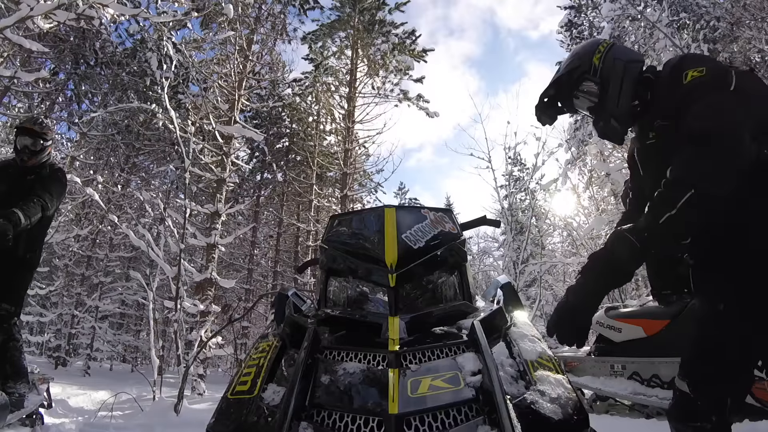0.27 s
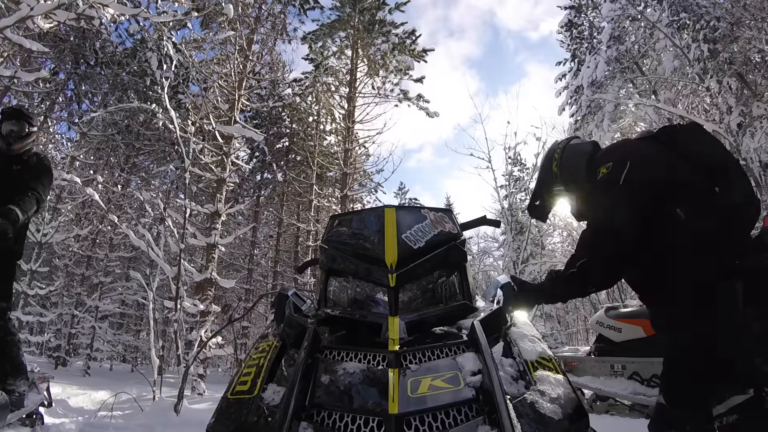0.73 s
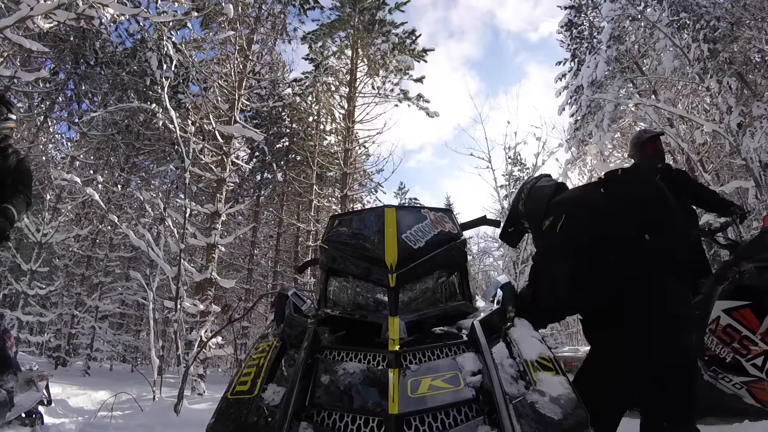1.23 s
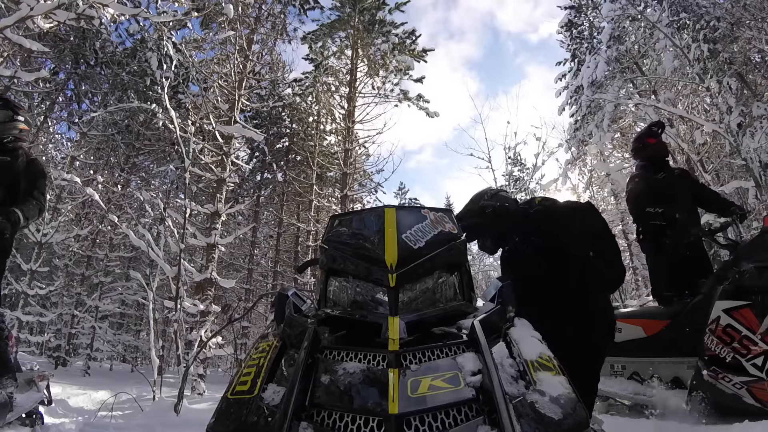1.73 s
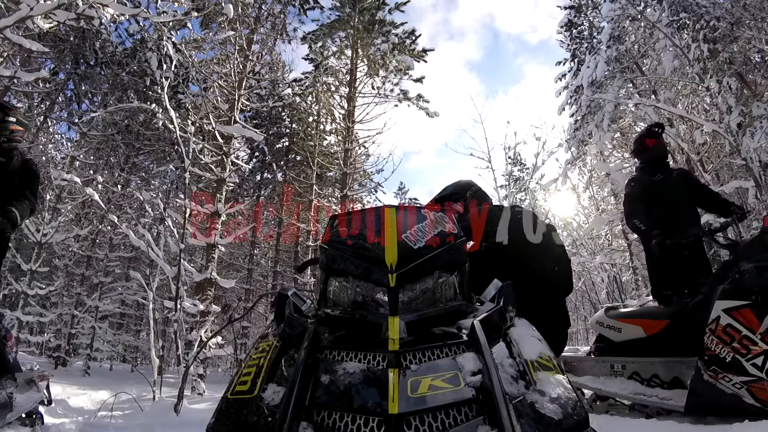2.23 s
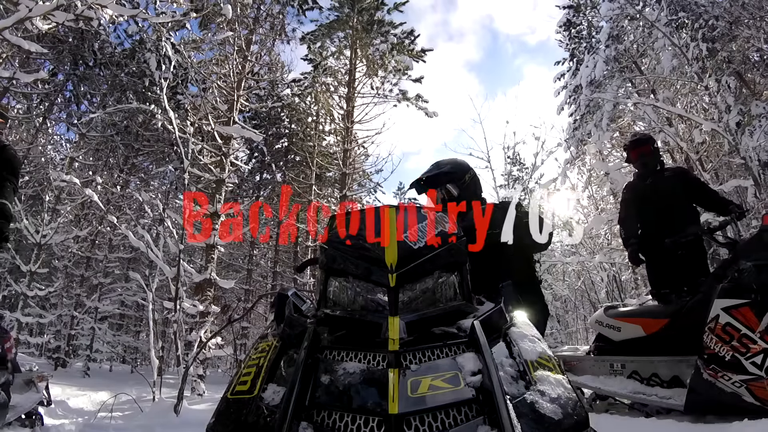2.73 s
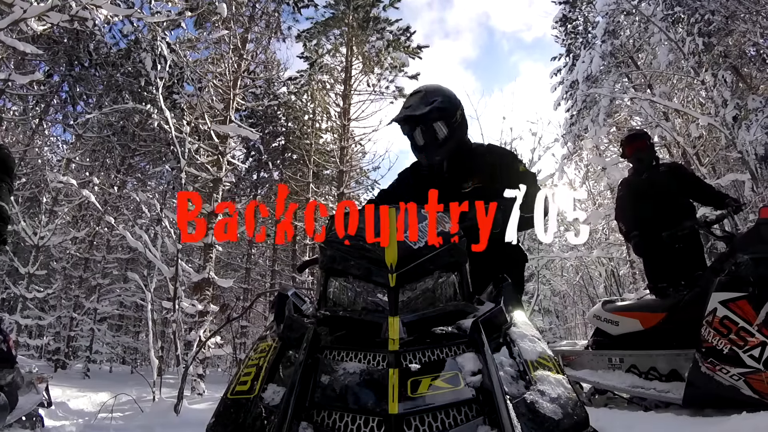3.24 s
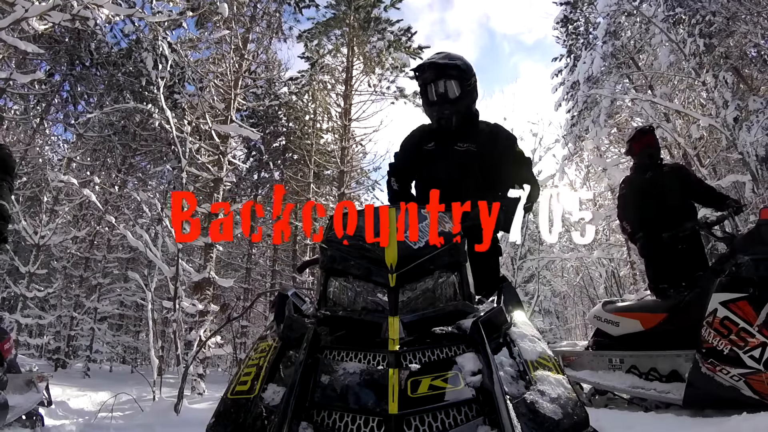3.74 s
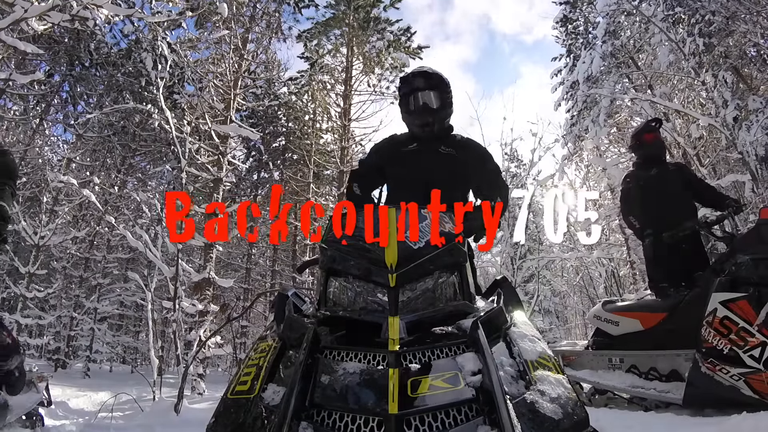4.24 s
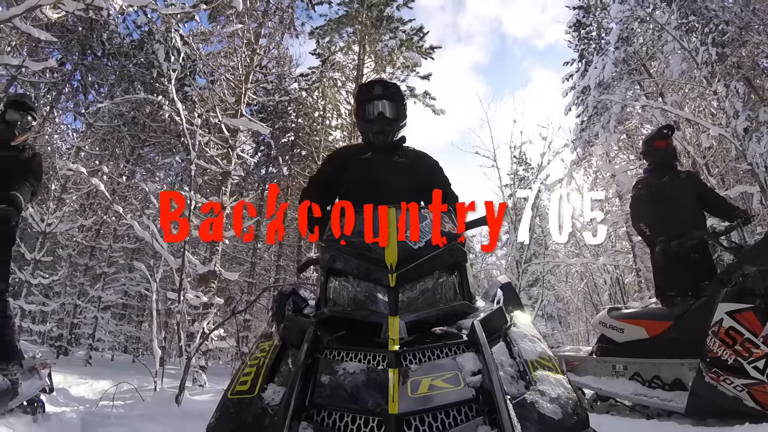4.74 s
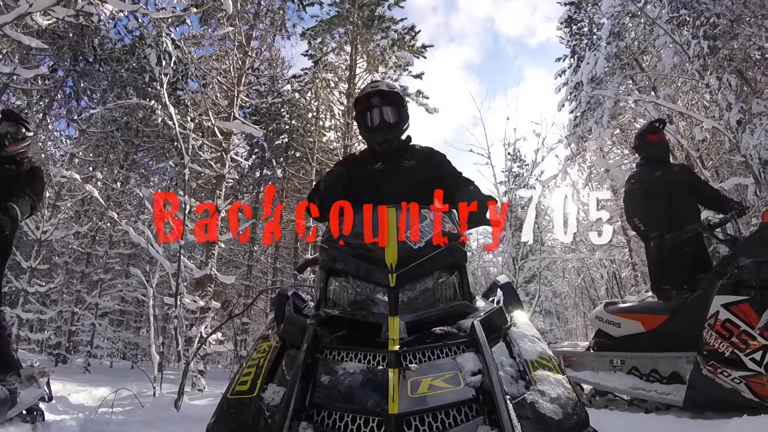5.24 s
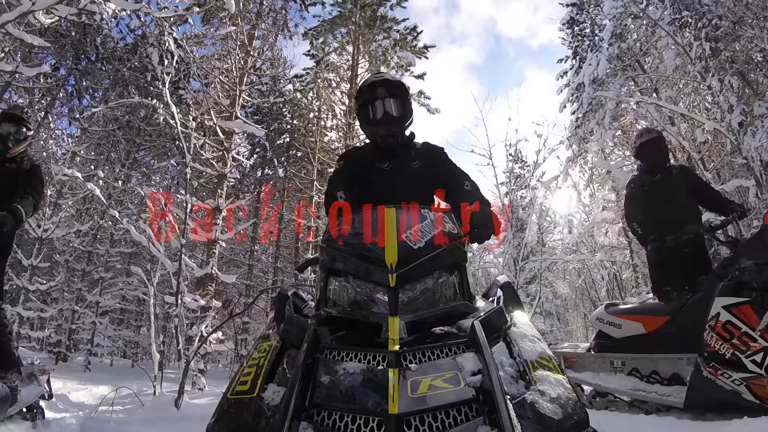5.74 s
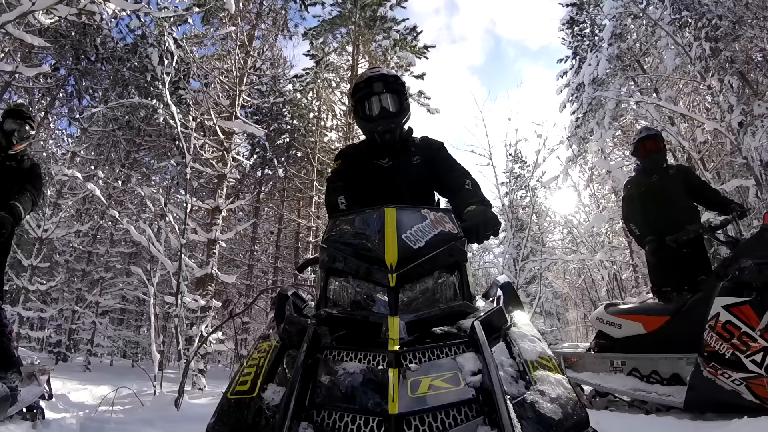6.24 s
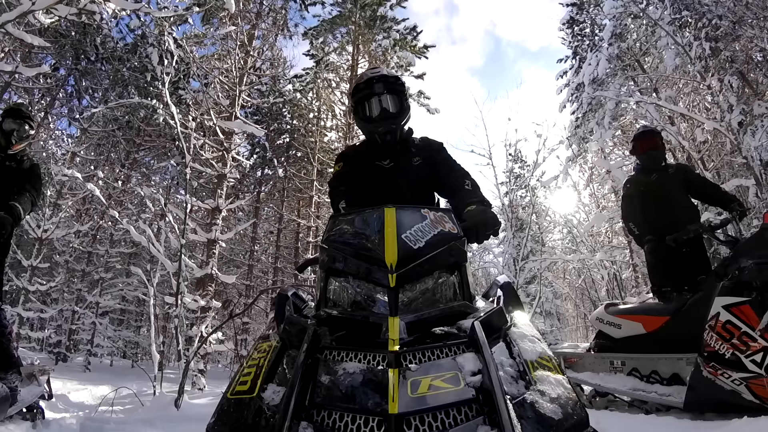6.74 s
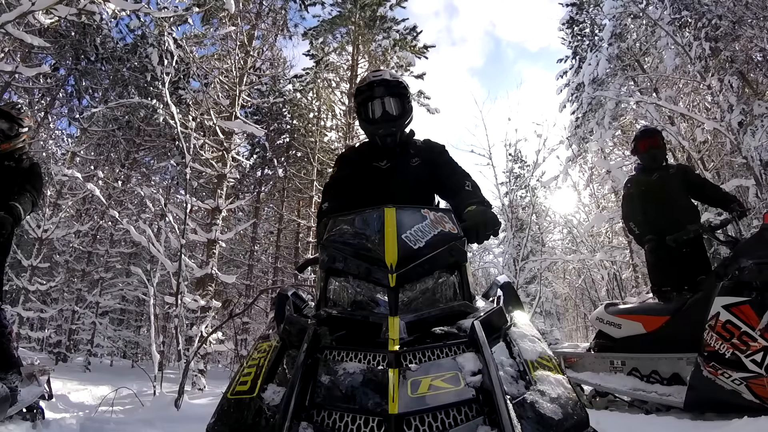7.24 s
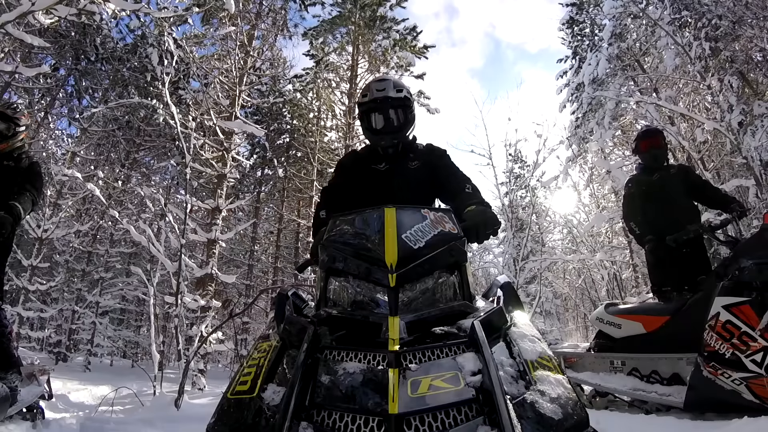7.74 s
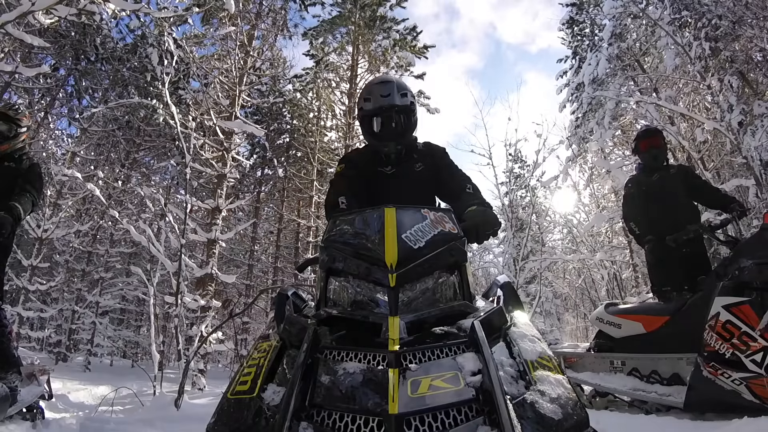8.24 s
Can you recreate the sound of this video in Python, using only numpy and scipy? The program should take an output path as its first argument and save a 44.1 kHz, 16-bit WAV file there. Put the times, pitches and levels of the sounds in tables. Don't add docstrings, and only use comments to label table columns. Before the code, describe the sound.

Close, boxy small-camera sound of snowmobiles idling among snowy trees. Irregular deep putts and short puffs of exhaust sit over a steadier distant drone and a breathy hiss. Light metallic ticks scatter through the middle. After about six seconds a loud knock cracks, the hiss dips, and a rope starter whirs up and back down with scraping and rattling, then a faint rewind and a last crunch of snow.

```python
import sys
import numpy as np
from scipy import signal
from scipy.fft import rfft, irfft, next_fast_len
from scipy.io import wavfile
from scipy.ndimage import uniform_filter1d

SR = 44100
rng = np.random.default_rng(int(sys.argv[2]) if len(sys.argv) > 2 else 0)


def linear_from_db(decibels):
    return 10 ** (np.asarray(decibels, float) / 20)


def pcm_store(signal):
    levels = np.round(np.clip(np.atleast_2d(signal), -1, 1) * 32767)
    wavfile.write(sys.argv[1], SR, levels.astype(np.int16).T)


N = 374409
T = np.arange(N) / SR

# frequency in Hz, density in dB per Hz.
RUMBLE = [(15, -26), (30, 8), (42, 6), (58, -0.5), (90, -5.5), (200, -39.5), (500, -87.5)]

# resonance in Hz, width in Hz, level in dB.
FAR_PIPE = [(115.1, 16.2, -0.5), (69, 90, -15.5), (176, 79, -15), (237, 24, -11.5), (298, 18, -11),
            (460, 71, -24.5)]
# time in seconds, level in dB.
FAR_LEVEL = [(0, -38), (0.25, -25), (0.55, -29), (1.0, -29), (1.2, -33), (2.1, -29), (3.3, -26.5),
             (3.7, -28), (4.7, -26), (5.0, -32), (5.4, -28), (6.1, -25), (6.42, -23.5), (6.62, -32),
             (7.1, -30), (7.5, -24), (7.7, -30), (8.1, -26)]

# first firing in seconds,
# spacing in ms, count, level in dB.
CYLINDER_A = [(0.006, 98, 2, -26), (0.343, 103, 4, -27), (0.788, 234, 2, -26), (1.054, 100, 1, -25),
              (1.186, 132, 2, -19.5), (1.484, 136, 2, -19), (1.722, 103, 2, -19), (1.958, 102, 2, -20),
              (2.191, 135, 4, -20), (2.697, 66, 2, -22), (2.897, 134, 3, -18), (3.269, 99, 2, -20),
              (3.5005, 136.3, 3, -18.5), (3.842, 100, 2, -20), (4.075, 134, 3, -19), (4.442, 131, 2, -19),
              (4.673, 104, 2, -21), (4.915, 102.3, 3, -19), (5.187, 100, 1, -27), (5.253, 100, 1, -21),
              (5.386, 132, 2, -20), (5.585, 137, 2, -18.5), (5.824, 102, 5, -21), (6.266, 102, 2, -22),
              (6.4005, 136, 2, -24), (6.779, 100, 1, -27), (6.854, 84, 2, -21.5), (7.011, 67, 2, -24),
              (7.25, 100, 1, -21), (7.383, 100, 1, -19), (7.518, 100, 1, -22), (7.5905, 131.5, 2, -25),
              (8.028, 103, 2, -21), (8.165, 100, 2, -22), (8.394, 100, 1, -21)]
CYLINDER_B = [(0.055, 135, 2, -29), (0.241, 47, 2, -24), (0.431, 101, 5, -25), (0.867, 86, 2, -25),
              (1.004, 100, 1, -22.5), (1.101, 100, 1, -27), (1.137, 100, 1, -20), (1.2665, 135, 5, -20),
              (1.91, 99, 3, -21), (2.242, 100, 1, -22), (2.343, 100, 1, -27), (2.411, 134.2, 6, -19),
              (3.182, 100, 1, -25), (3.249, 100, 1, -18.5), (3.383, 136, 4, -18), (3.891, 99, 2, -19),
              (4.125, 134, 3, -17), (4.49, 135, 3, -19.5), (4.8645, 101.2, 6, -18), (5.499, 137, 3, -18),
              (5.874, 69, 2, -22), (6.048, 132, 2, -20), (6.2155, 134, 2, -23), (6.418, 137, 2, -23),
              (6.678, 100, 1, -26), (6.754, 118, 2, -21), (6.978, 59, 2, -22), (7.168, 166, 2, -23.5),
              (7.468, 100, 1, -18.5), (7.601, 36, 2, -24), (7.772, 138, 2, -20), (8.011, 103, 2, -22),
              (8.247, 134, 2, -20), (8.448, 100, 1, -21)]
# frequency in Hz, ring in ms, level in dB, delay in ms.
LIT_PIPE = [(110, 9.3, 4.9, -5.6), (102, 4.5, 4.6, 8.0), (172, 4.7, -4.1, -4.3), (280, 3.4, -2.6, -3.3),
            (260, 8, -17.5, -2.3)]
# frequency in Hz, ring in ms, level in dB, delay in ms.
UNLIT_PIPE = [(97, 11.3, -1.5, -1.3), (239, 2.1, -19, -0.4)]
STROKE_HZ = 59.3
FIRING_DB, FIRING_SCATTER_DB = 1.05, 0.8
FOLLOW_DB = -0.6
GATHER_DB, GATHER_S = 4, 0.07

# frequency in Hz, density in dB per Hz.
INTAKE = [(200, -23.5), (400, 0.5), (700, -6), (1250, -7), (1600, -20), (2400, -37), (4000, -95)]
# frequency in Hz, density in dB per Hz.
FAN = [(900, -16), (1500, 0), (2300, -2.5), (3100, -5.5), (4200, -7.5), (5500, -67)]
# time in seconds, level in dB.
FLOW = [(0, -20.5), (0.18, -12), (0.195, -9), (0.3, -0.5), (0.8, -1), (1.4, -2), (2.5, -1.5), (3.3, -0.7),
        (3.7, 0), (4.9, -0.5), (5.3, 0), (6.4, -2.5), (6.6, -6), (7.0, -9), (7.4, 3.5), (7.85, 1.5),
        (8.3, 0), (8.49, 3)]
# time in seconds, level in dB.
CHUFFS = [(0.7595, -32.5), (1.199, -35), (2.0053, -30), (2.056, -28), (2.2337, -28), (1.57, -32.5),
          (1.766, -34), (1.815, -38), (2.3246, -36), (2.382, -34.5), (2.457, -34.5), (2.527, -36.5),
          (2.617, -30), (2.758, -35.5), (2.861, -30), (3.031, -32), (3.0796, -39.5), (3.364, -39.5),
          (3.381, -36), (3.436, -36.5), (3.322, -39.5), (3.514, -33.5), (3.532, -39.5), (3.577, -35),
          (3.655, -38.5), (3.67, -37.5), (3.784, -36.5), (3.216, -37), (3.267, -35), (3.489, -32.5),
          (3.704, -37), (4.014, -30), (4.492, -32), (4.6438, -30.5), (4.8673, -34.5), (4.952, -34.5),
          (5.0382, -34), (5.087, -34), (5.2205, -37), (5.17, -38), (5.265, -37.5), (5.3572, -35),
          (5.951, -33), (6.335, -32.5), (4.145, -35.5), (4.337, -41.5), (4.811, -35), (5.405, -27),
          (5.4886, -37), (5.777, -28), (6.133, -34.5), (6.285, -27), (6.3619, -45), (7.897, -39),
          (8.182, -39), (8.2447, -34), (8.315, -36)]
INTAKE_DB, FAN_DB, HISS_DB = -44, -49.5, -48.5
INTAKE_SLOPE, FAN_SLOPE = 0.42, 1
FAN_START_DB, FAN_SETTLE_S = 10, 0.49
VEIL_S, VEIL_HZ = 0.82, 7140
LEAK_DB, LEAK_SCATTER_DB, LEAK_TOP_DB, LEAK_LEAD_S = -46, 3, -37, 0.006

# start, rise, hold and fall in seconds, level in dB.
SNOW = [
    (0.146, 0.083, 0.068, 0.04, -39.5),
    (0.683, 0.077, 0.553, 0.092, -43.5),
    (7.975, 0.092, .04, .05, -40.5),
    (8.199, 0.049, .06, .05, -36.5),
]

# time in seconds, ring level in dB, ring in Hz, ring in ms,
# crack level in dB, crack in ms.
KNOCKS = [(6.4975, -13, 686, 3.1, -29.5, 5.9), (6.497, -27, 950, 2.5, -39, 3.6),
          (6.494, -39, 630, 2, -26.5, 3.3), (6.5085, -15.5, 200, 5, -33.5, 2.3),
          (6.499, -23, 400, 3.4, -44, 3), (6.487, -35, 790, 3.3, -25.5, 3.3), (6.507, -25, 690, 3, -29, 2),
          (6.516, -21, 760, 4.8, -43.5, 1.9), (6.672, -37, 686, 3.7, -27.5, 12),
          (6.748, -35, 810, 3.7, -31, 11), (8.454, -31.5, 535, 5.8, -60, 3),
          (8.444, -43, 2050, 5.4, -34.5, 7.2), (6.61, -42, 4660, 6.5, -33, 7.8),
          (6.632, -45, 4610, 6, -50, 5), (6.1, -50, 4200, 4, -51, 5), (8.1, -54, 9100, 16, -61, 9.0),
          (6.52, -50, 6430, 22, -51, 9.0), (5.7, -53, 3700, 6, -46.5, 6.5),
          (6.685, -47, 8200, 14, -49.5, 5.0), (7.6, -43, 7200, 15, -48, 5.0), (7.8, -58, 2200, 9, -61, 5.0),
          (7.7415, -36, 2300, 3.5, -44.5, 4.0), (7.39, -46, 2200, 5, -53, 4.0),
          (0.159, -36, 580, 3.3, -68, 2.0), (6, -42, 2090, 7, -46, 6.5), (7.655, -43, 2100, 5.1, -60, 4),
          (7.785, -41, 1700, 4.9, -55, 4), (7.845, -40, 2030, 3.04, -52, 4), (5.5, -46, 1600, 5, -49, 4),
          (6.954, -42, 2090, 5, -48, 4), (6.475, -48, 2900, 1, -49, 1)]
# time in seconds, level in dB, ring in Hz.
TICKS = [(1.858, -39, 2200), (2.028, -39, 2400), (2.529, -40, 2500), (2.73, -38, 2300), (2.832, -39, 2000),
         (4.168, -38, 2300), (4.412, -39, 2400), (5.087, -39, 2200), (5.319, -39, 2500), (6.065, -40, 2200),
         (6.301, -38, 2400), (2.966, -39, 1920), (3.403, -36, 2300), (3.435, -38, 2500), (3.555, -37, 2400),
         (3.577, -40, 2900), (3.602, -40, 2400), (3.673, -37, 2400), (3.705, -37, 2100), (4.01, -38, 1850),
         (4.444, -40, 1600), (5.41, -42, 2200), (6.436, -40, 1750)]

# time in seconds, pawl rate in Hz, effort in dB.
STARTER = [
    [(6.57, 84.1, -4), (6.745, 100.9, 2), (6.815, 130.1, -0.5), (6.875, 143.1, 2.5), (7.02, 153.9, 1),
     (7.1, 141.3, 3), (7.3, 95.75, -1.5), (7.486, 61.06, 0), (7.75, 57.8, -9.5)],
    [(7.9, 88.1, -6), (8.158, 85.9, -14), (8.25, 83.4, -10), (8.4, 77.3, -16.5)],
]
# frequency in Hz, level in dB.
DRUM = [(60, -17), (135, 14), (165, 6), (210, 2.5), (300, 3), (440, -3), (580, -1), (730, 5.5), (900, -7),
        (1200, -14)]
# resonance in Hz, width in Hz, level in dB.
COWL = [(210, 120, -3), (424, 260, -5.5), (680, 110, -1), (990, 165, -10), (1450, 136, -11),
        (2106, 100, -15), (2428, 79, -12.5), (2270, 260, -18), (6470, 82, -20.5)]
# frequency in Hz, level in dB.
COWL_EDGE = [(1500, 0), (1850, -6), (2050, -2), (2480, -1), (2620, -12), (3500, -6), (5000, -1)]
TONE_DB, SCRAPE_DB, ROPE_DB = -41.5, -33.5, -41.5
TONE_SLOPE, ROPE_SLOPE = 1, 2.1
TONE_STUTTER_DB = 4
HALF_TURN = 0.4
HEAVE_DB = 7.5
# time in seconds, level in dB.
RATTLES = [(6.602, -47.5), (6.692, -43.5), (6.77, -45), (6.82, -50), (6.892, -50.5), (6.92, -49),
           (7.015, -50.5), (7.062, -52)]
RATTLE_HZ, RATTLE_MS, RATTLE_RASP_DB = 6500, 5.3, 10.5

# frequency in Hz, level in dB.
PORT = [(8, -49), (27, 4.5), (60, -1.5), (3000, 0.5), (4360, -7), (5600, 13.5), (6050, 6), (6450, 9.5),
        (7300, -2.5), (9600, -6.5), (10400, -14.5), (11200, -22.5), (11600, -40)]
SQUEEZE = 1.6
PATCH_HZ, PATCH_FROM_HZ, PATCH_FRAMES = 330, 10250, 7
FIZZ_DB, FIZZ_START_S = -77, 1.7


def noise():
    return rng.standard_normal(N)


def level(x, db=0):
    return x * linear_from_db(db) / np.sqrt(np.mean(x ** 2))


def colour(x, points):
    hz, db = np.transpose(points)
    size = next_fast_len(N)
    axis = np.log(np.arange(size // 2 + 1) * SR / size + 1)
    gain = linear_from_db(np.interp(axis, np.log(hz), db))
    return irfft(rfft(x, size) * gain, size)[:N]


def resonate(x, peaks):
    out = np.zeros(N)
    for k, (hz, width, db) in enumerate(peaks):
        b, a = signal.iirpeak(hz, hz / width, SR)
        out += (-1) ** k * linear_from_db(db) * signal.lfilter(b, a, x)
    return out


def swell(age):
    return np.e * age * np.exp(-age)


def ring(seconds, sizes, hz, ms):
    spikes = np.zeros(N + 1)
    at = np.clip(np.round(np.asarray(seconds) * SR).astype(int), 0, N)
    np.add.at(spikes, at, sizes)
    t = T[:SR // 8]
    carrier = np.sin(2 * np.pi * hz * t) if hz > 0 else 1
    return signal.fftconvolve(spikes[:N], swell(t / (ms / 1000)) * carrier)[:N]


def add(out, s, size, hz, ms, carrier=None):
    i = int(s * SR)
    t = T[:min(int(ms * SR / 80), N - i)]
    wave = np.sin(2 * np.pi * hz * t) if carrier is None else carrier[i:i + len(t)]
    out[i:i + len(t)] += size * swell(t / (ms / 1000)) * wave


def walk(rate):
    k = int(SR / rate)
    held = np.repeat(rng.standard_normal(N // k + 1), k)
    return 1.295 * uniform_filter1d(uniform_filter1d(held, k), k)[:N]


def air_rumble():
    return level(colour(noise(), RUMBLE) * linear_from_db(2.0 * walk(6.3)), -39.0)


def far_sled():
    jitter, scatter, catch = rng.standard_normal((3, 800))
    s = np.cumsum((1 + 0.085 * jitter) / 58.3)
    sizes = linear_from_db(1.8 * scatter - 7.6 * (catch < 0.2))
    drone = level(resonate(ring(s, sizes, 0, 0.67), FAR_PIPE))
    return drone * linear_from_db(np.interp(T, *np.transpose(FAR_LEVEL)))


def firings():
    rows = []
    for start, ms, count, db in [*CYLINDER_A, *CYLINDER_B]:
        rows += [(start + k * ms / 1000, db) for k in range(count)]
    s, db = np.transpose(sorted(rows))
    follows = np.diff(s, prepend=-1) < 1.4 / STROKE_HZ
    return s, db + FIRING_DB + FOLLOW_DB * follows + FIRING_SCATTER_DB * rng.standard_normal(len(s))


def strokes(lit):
    steps = np.maximum(np.round(np.diff(lit) * STROKE_HZ), 1)
    count = np.concatenate([[0], np.cumsum(steps)])
    every = np.arange(count[-1])
    unlit = np.setdiff1d(every, count)
    return np.interp(every, count, lit), np.interp(unlit, count, lit)


def near_twin(lit, lit_db, every, unlit):
    usual_db = np.interp(unlit, lit, uniform_filter1d(lit_db, size=7))
    waited = unlit - lit[np.searchsorted(lit, unlit) - 1]
    gather_db = GATHER_DB * np.minimum(waited / GATHER_S, 1)
    pump = linear_from_db(2.3 * rng.standard_normal(len(unlit)) + usual_db + gather_db)
    shake = np.sin(np.pi * np.interp(T, every, np.arange(len(every))))
    out = linear_from_db(-50.0) * shake * linear_from_db(2.0 * walk(4.5))
    for hz, ms, db, lag in LIT_PIPE:
        out += ring(lit + lag / 1000, linear_from_db(lit_db + db), hz, ms)
    for hz, ms, db, lag in UNLIT_PIPE:
        out += ring(unlit + lag / 1000, pump * linear_from_db(db), hz, ms)
    return out


def gas_chuffs(lit):
    leak_db = LEAK_DB + LEAK_SCATTER_DB * rng.standard_exponential(len(lit))
    leak_db = np.minimum(leak_db, LEAK_TOP_DB)
    before, after = [lit - LEAK_LEAD_S, leak_db], [lit + LEAK_LEAD_S, leak_db[::-1]]
    s, db = np.hstack([np.transpose(CHUFFS), before, after])
    sizes = linear_from_db(np.minimum(db, -28) + 35.0)
    return ring(s, sizes, 0, 0.98) + 0.5 * ring(s, sizes, 0, 4.0)


def gas(every, lit):
    puff_db = 2.5 * np.minimum(rng.standard_exponential(len(every)), 2.5)
    puffs = level(ring(every - 0.004, linear_from_db(puff_db), 0, 2.1))
    chuffs = gas_chuffs(lit)
    flicker = walk(30)
    intake = colour(noise() * (1 + 0.2 * puffs + 0.64 * chuffs), INTAKE)
    fan = colour(noise() * (1 + 0.12 * puffs + 0.5 * chuffs) * linear_from_db(flicker), FAN)
    hiss = noise() * (1 + 0.17 * puffs + 1.54 * chuffs) * linear_from_db(0.95 * flicker)
    hiss = colour(hiss, [(3000, -51.0), (4200, -5.5), (7500, -3.5), (11000, -6.0)])
    veiled = colour(hiss, [(VEIL_HZ / 2.5, -40), (VEIL_HZ * 1.03, 0)])
    hiss = hiss - np.exp(-T / VEIL_S) * veiled
    flow_db = np.interp(T, *np.transpose(FLOW))
    intake_db = INTAKE_DB + INTAKE_SLOPE * flow_db
    fan_db = FAN_DB + FAN_SLOPE * flow_db + FAN_START_DB * np.exp(-T / FAN_SETTLE_S)
    return level(intake) * linear_from_db(intake_db) + level(fan) * linear_from_db(fan_db) + level(hiss) * linear_from_db(HISS_DB + flow_db)


def snow():
    creak = colour(noise() * linear_from_db(1.1 * walk(120)),
                   [(250, -20.5), (380, -4.0), (620, -6), (700, -17), (2000, -18.0), (3000, -48)])
    press = colour(noise(), [(20, -20.5), (40, 8.5), (60, 4.5), (100, -34.5)])
    weight = np.zeros(N)
    for s, rise, hold, fall, db in SNOW:
        weight += linear_from_db(db) * np.interp(T, np.cumsum([s, rise, hold, fall]), [0, 1, 1, 0])
    return (level(creak) + level(press, 3.7)) * weight


def rasp():
    return level(colour(noise(), [(300, 13.0), (900, 6.5), (3000, -9.0), (10800, -0.5), (11600, -9.5)]))


def cowl_knocks():
    out, crack = np.zeros(N), rasp()
    for s, db, hz, ms, crack_db, crack_ms in KNOCKS:
        add(out, s, linear_from_db(db), hz, ms)
        add(out, s, linear_from_db(crack_db), hz, crack_ms, crack)
    return out


def clutch_ticks():
    out = np.zeros(N)
    for s, db, hz in TICKS:
        add(out, s, linear_from_db(db), hz, 0.3)
    return out


def drum_tone(turns, hz):
    edge, gain_db = np.transpose(DRUM)
    dull_db = -6 * np.clip(1 - hz / 140, 0, 1)
    tone = np.zeros(N)
    for k in range(1, 10):
        stutter_db = min(k / 3, 1) * TONE_STUTTER_DB * walk(36)
        db = np.interp(k * hz, edge, gain_db) + (k - 4) * dull_db + stutter_db
        tone += linear_from_db(db) * np.sin(2 * np.pi * k * turns + k * k)
    return np.sqrt(2) * tone * (1 + HALF_TURN * np.cos(np.pi * turns))


def starter():
    s, pawl_hz, effort = np.transpose(np.concatenate(STARTER))
    hz, effort_db = np.interp(T, s, pawl_hz), np.interp(T, s, effort)
    pulling = sum(1.0 * (T > pull[0][0]) * (T < pull[-1][0]) for pull in STARTER)
    turns = np.cumsum(hz * (1 + 0.013 * walk(35))) / SR
    gate = 1 + 0.2 * np.cos(2 * np.pi * turns)
    tone = drum_tone(turns, hz)
    heave = level(colour(noise(), [(25, -27), (45, 2), (62, 3.5), (85, -7.5), (130, -34)]), HEAVE_DB)
    scrape = colour(resonate(noise() * gate * linear_from_db(1.7 * walk(25.0)), COWL), COWL_EDGE)
    rope = colour(noise() * gate * linear_from_db(0.33 * walk(35)),
                  [(2500, -12.0), (4000, -5.5), (5600, -16.5), (8000, 1.0), (10500, -12.0), (11800, -9)])
    out = (heave + tone) * linear_from_db(TONE_DB + TONE_SLOPE * effort_db)
    out += level(scrape, -0.56) * linear_from_db(SCRAPE_DB + effort_db)
    out += level(rope, -1.7) * linear_from_db(ROPE_DB + ROPE_SLOPE * effort_db)
    return uniform_filter1d(pulling, size=2000) * out


def spring_rattles():
    out, scratch = np.zeros(N), rasp()
    for s, db in RATTLES:
        add(out, s, linear_from_db(db), RATTLE_HZ, RATTLE_MS)
        add(out, s, linear_from_db(db + RATTLE_RASP_DB), RATTLE_HZ, RATTLE_MS, scratch)
    return out


def scene():
    lit, lit_db = firings()
    every, unlit = strokes(lit)
    engines = far_sled() + near_twin(lit, lit_db, every, unlit) + gas(every, lit)
    loose_parts = cowl_knocks() + clutch_ticks() + spring_rattles()
    return (air_rumble() + engines + snow() + loose_parts + starter())[None]


def patchy(x):
    fizz = level(colour(noise(), [(10700, -60), (11000, 0), (12700, 0), (13500, -5)]), FIZZ_DB)
    hz, s, (sound, fizz) = signal.stft(np.array([x, fizz]), SR, nperseg=1024)
    power = np.mean(abs(sound[(hz > 8000) & (hz < 10000)]) ** 2, axis=0)
    treble_db = 10 * np.log10(uniform_filter1d(power, size=3) + 1e-18)
    loud = np.clip((treble_db - np.median(treble_db)) / 8, -1, 2)
    band = np.clip((hz - PATCH_FROM_HZ) // PATCH_HZ, -1, 11).astype(int)
    chance = uniform_filter1d(rng.standard_normal((12, len(s))), size=PATCH_FRAMES, axis=1)
    chance = chance * np.sqrt(PATCH_FRAMES)
    order = np.arange(12)[:, None]
    opens = (chance < 0.75 * loud - 0.6 - 0.3 * order) & (order < 3)
    fizz_limit = 1.0 - 0.8 * loud - 0.1 * (order - 4.5) ** 2 - 4 * np.exp(-s / FIZZ_START_S)
    fizzes = chance + 0.7 * chance[0] < fizz_limit
    top = sound * opens[band] + fizz * fizzes[band] * linear_from_db(3.2 * loud)
    kept = np.where(band[:, None] < 0, sound, top)
    return signal.istft(kept, SR, nperseg=1024)[1][:N]


def band_limit(x):
    return signal.sosfilt(signal.butter(12, 13670, fs=SR, output="sos"), x)


def record(dry):
    rounded = np.tanh(SQUEEZE * dry[0]) / SQUEEZE
    mix = patchy(colour(rounded, PORT))[None]
    return band_limit(mix)


dry = scene()
out = record(dry)
pcm_store(out)
```